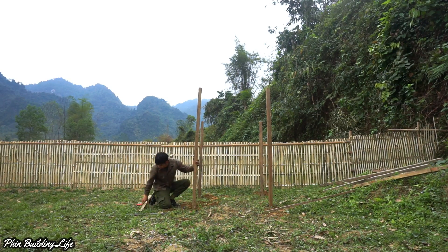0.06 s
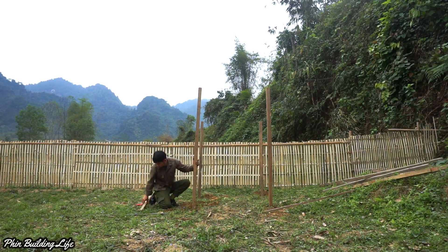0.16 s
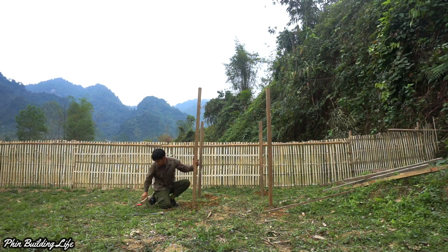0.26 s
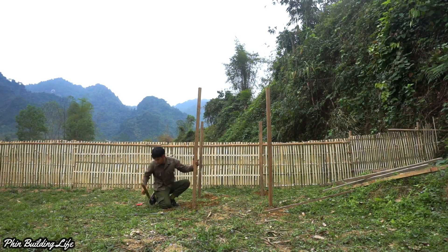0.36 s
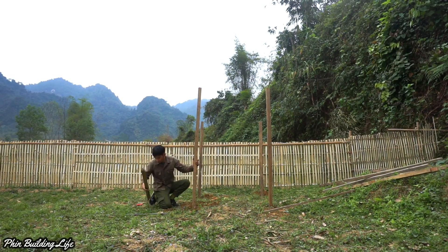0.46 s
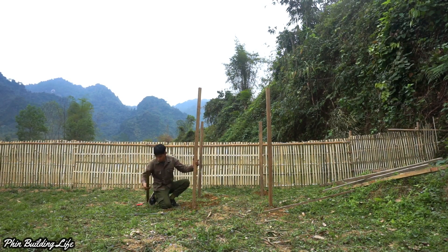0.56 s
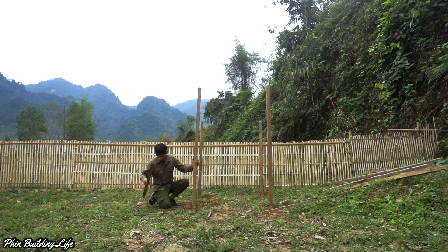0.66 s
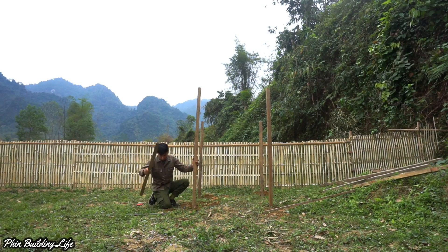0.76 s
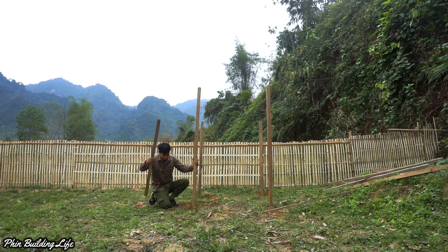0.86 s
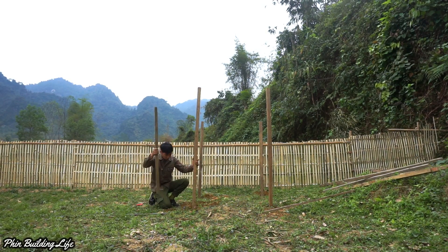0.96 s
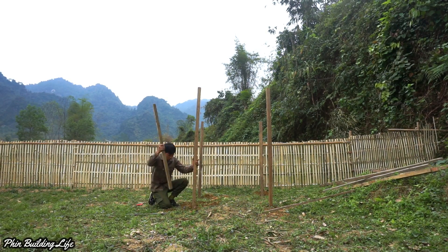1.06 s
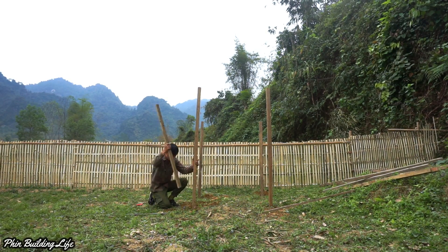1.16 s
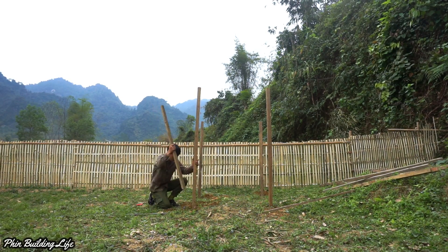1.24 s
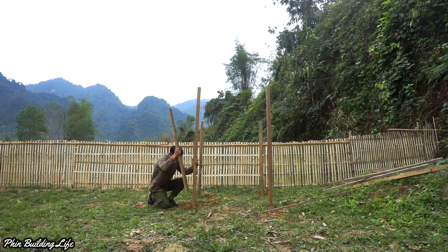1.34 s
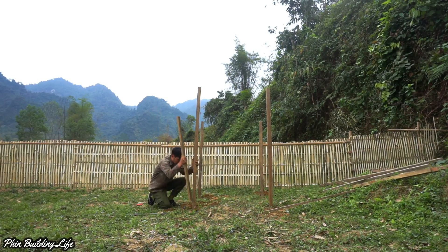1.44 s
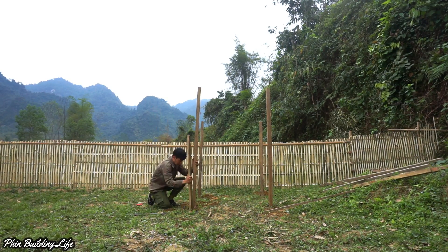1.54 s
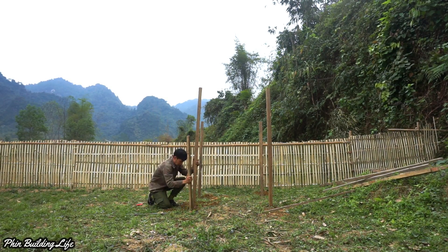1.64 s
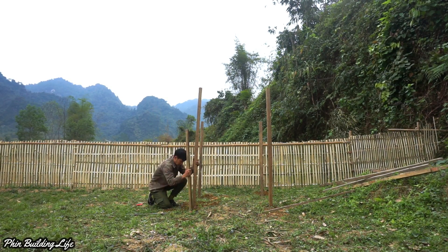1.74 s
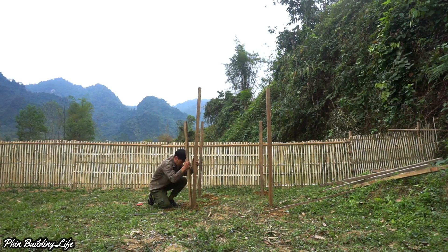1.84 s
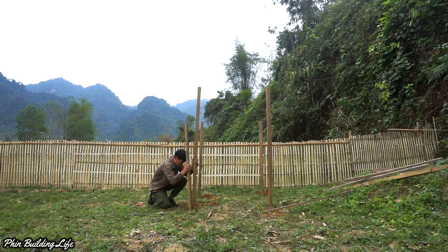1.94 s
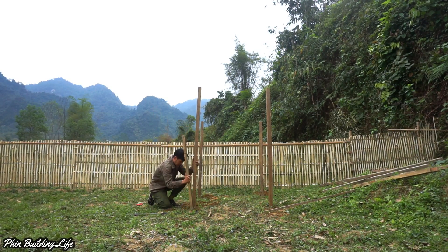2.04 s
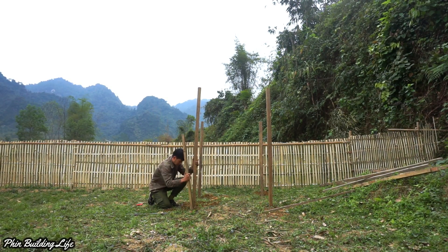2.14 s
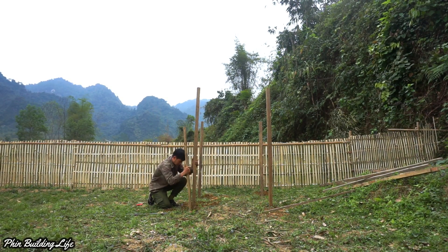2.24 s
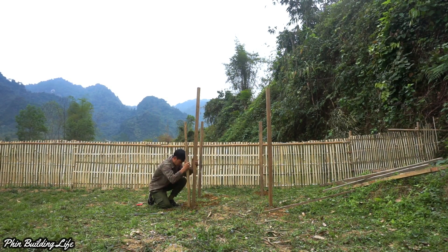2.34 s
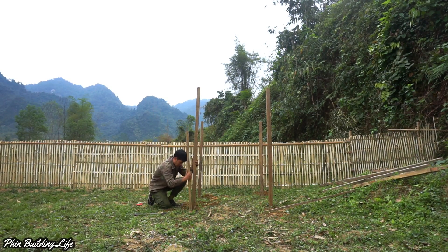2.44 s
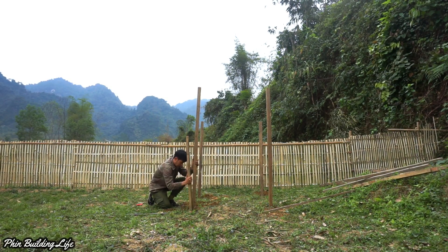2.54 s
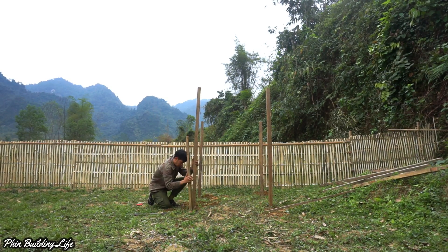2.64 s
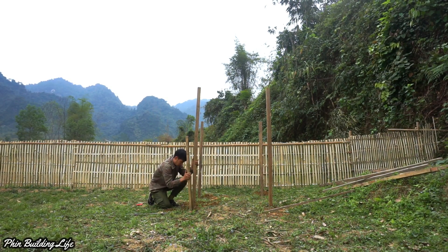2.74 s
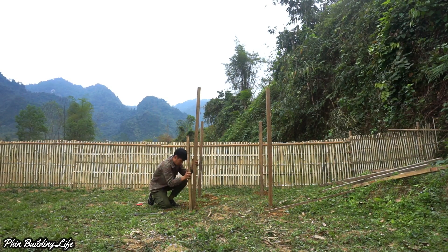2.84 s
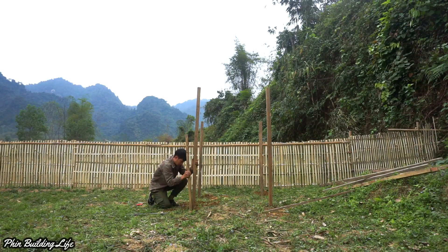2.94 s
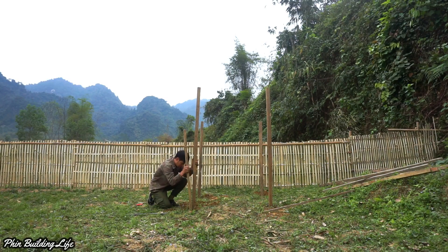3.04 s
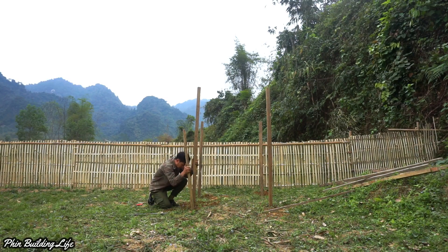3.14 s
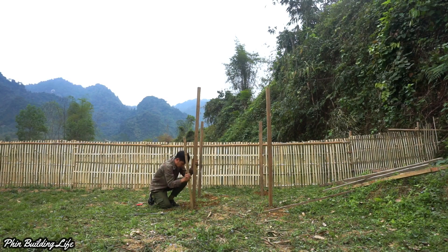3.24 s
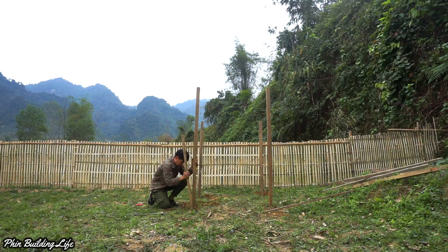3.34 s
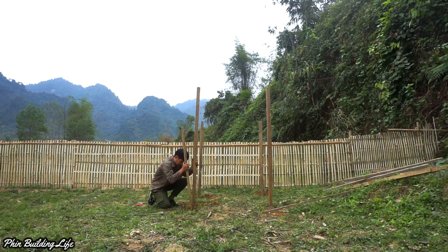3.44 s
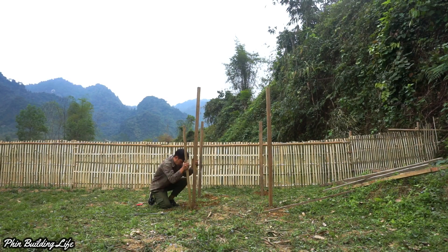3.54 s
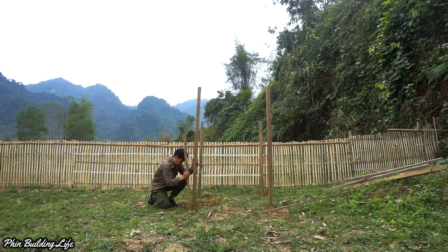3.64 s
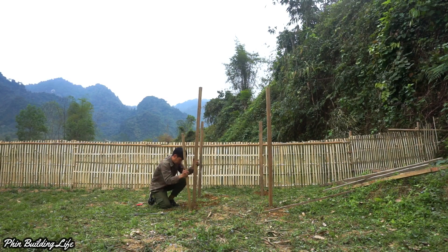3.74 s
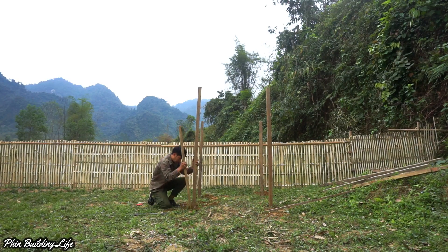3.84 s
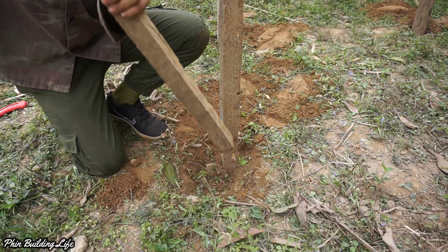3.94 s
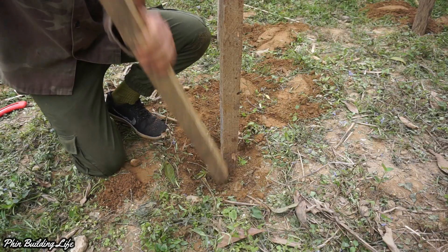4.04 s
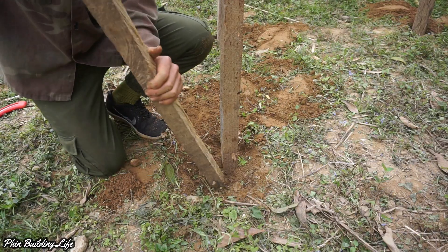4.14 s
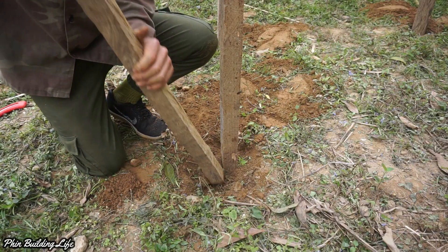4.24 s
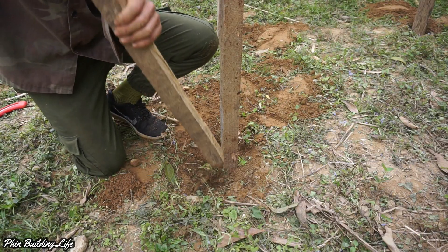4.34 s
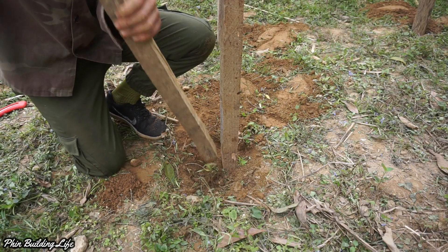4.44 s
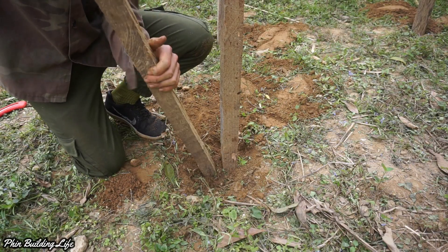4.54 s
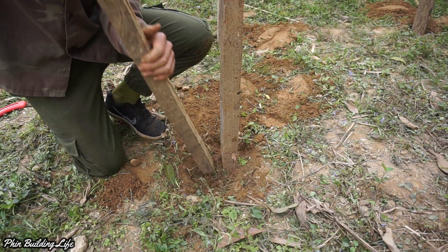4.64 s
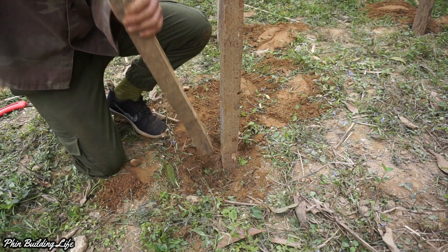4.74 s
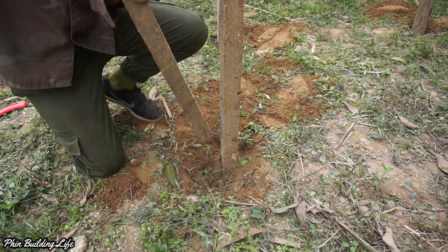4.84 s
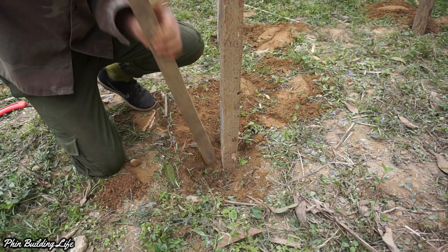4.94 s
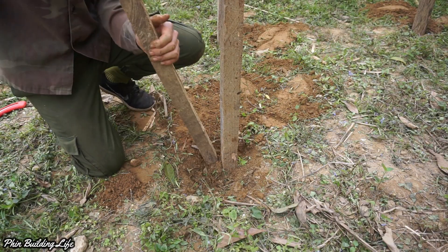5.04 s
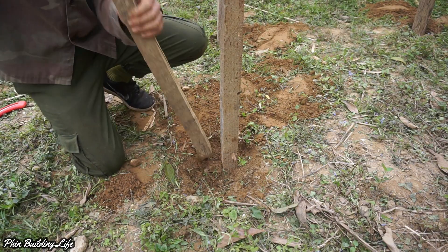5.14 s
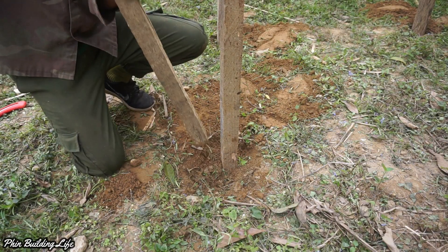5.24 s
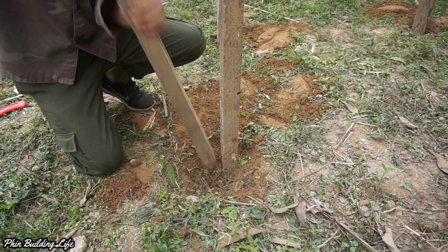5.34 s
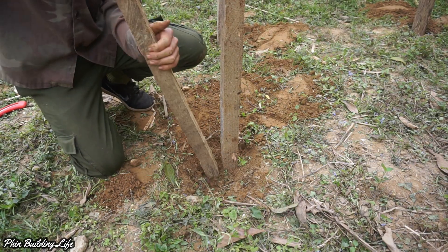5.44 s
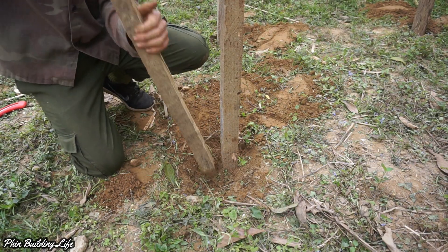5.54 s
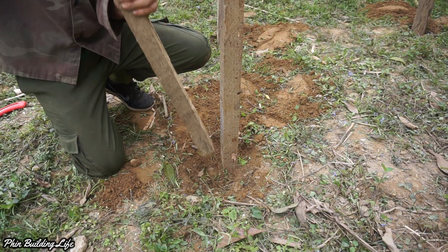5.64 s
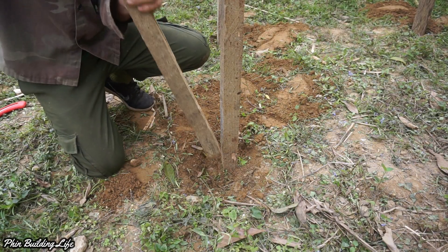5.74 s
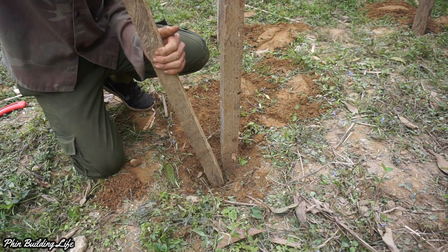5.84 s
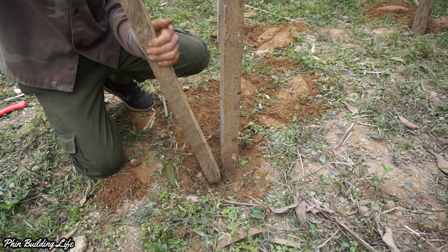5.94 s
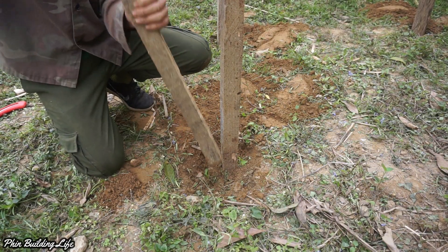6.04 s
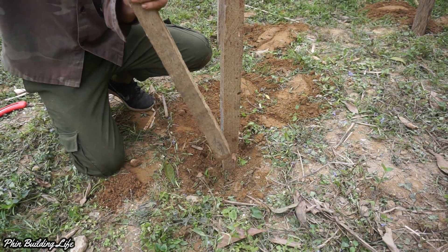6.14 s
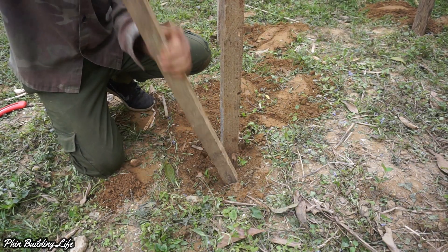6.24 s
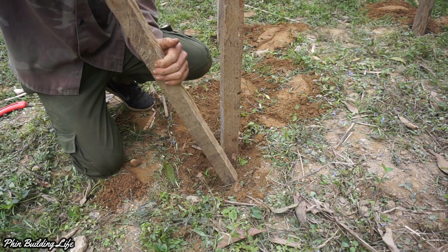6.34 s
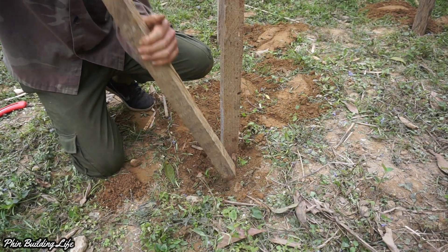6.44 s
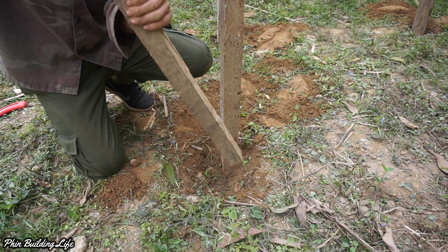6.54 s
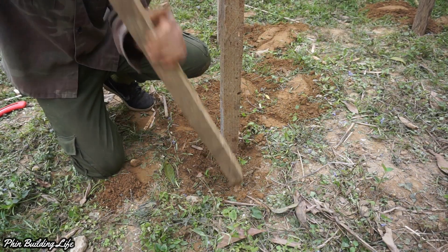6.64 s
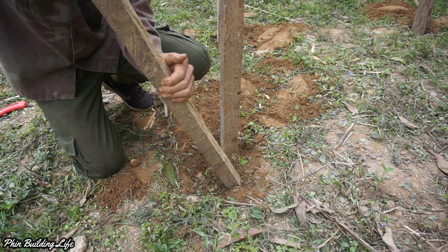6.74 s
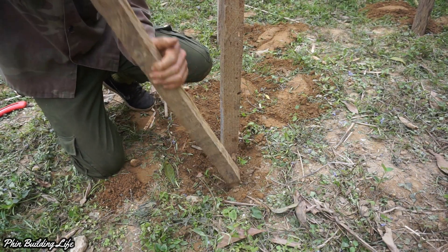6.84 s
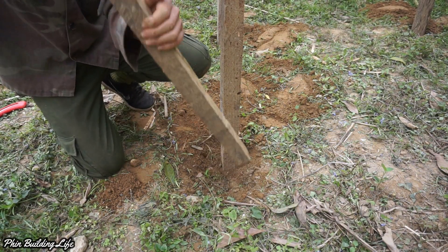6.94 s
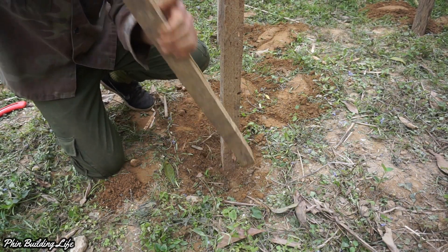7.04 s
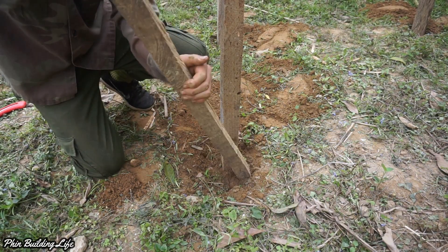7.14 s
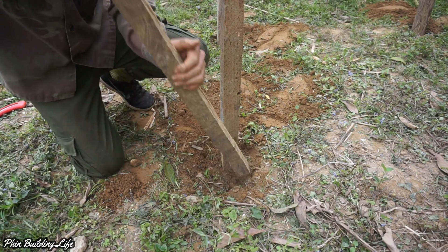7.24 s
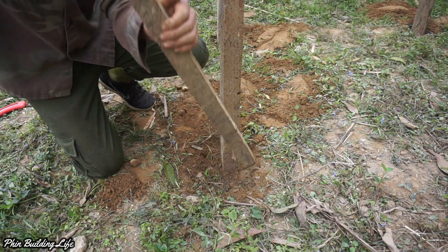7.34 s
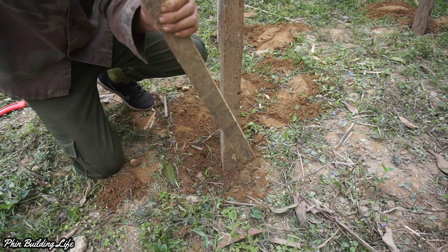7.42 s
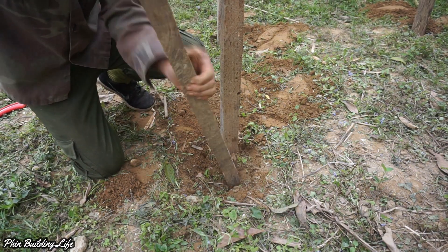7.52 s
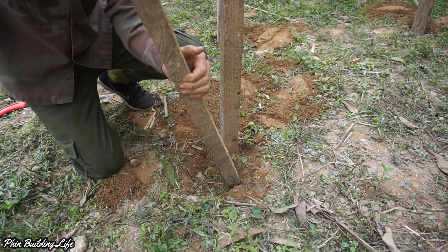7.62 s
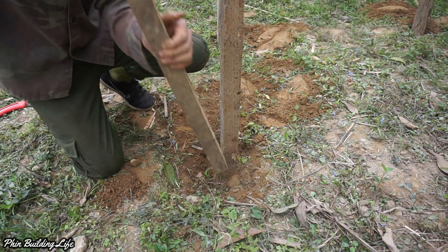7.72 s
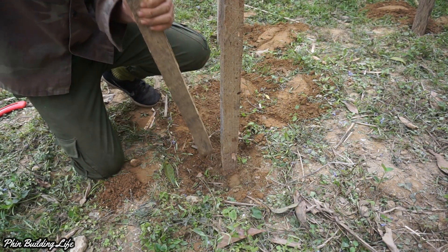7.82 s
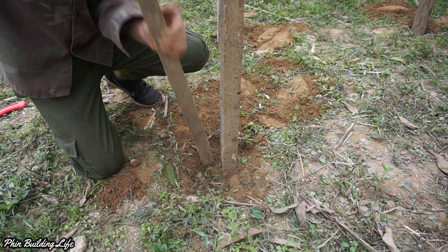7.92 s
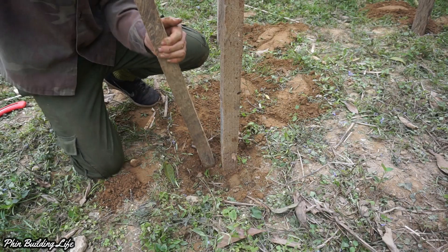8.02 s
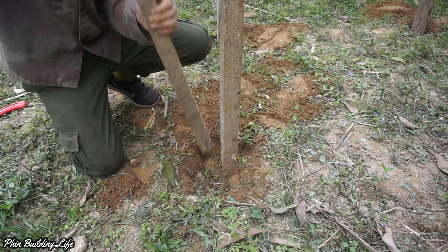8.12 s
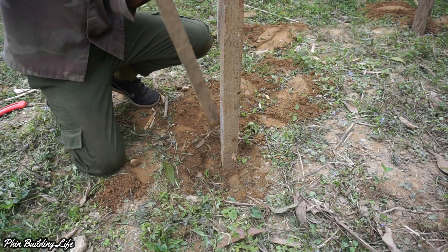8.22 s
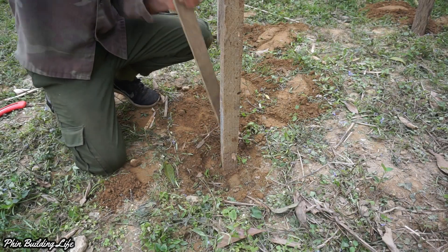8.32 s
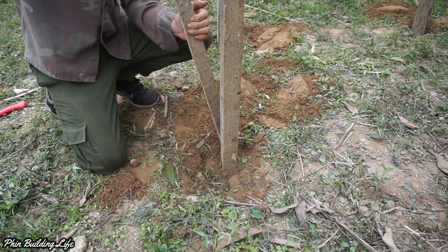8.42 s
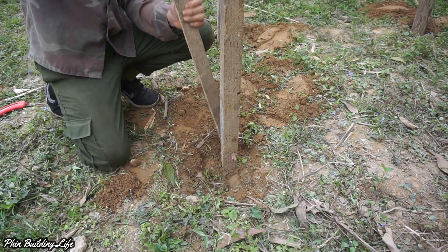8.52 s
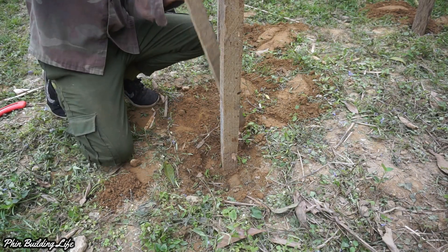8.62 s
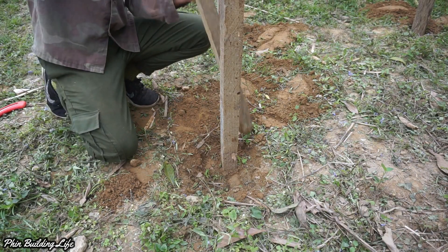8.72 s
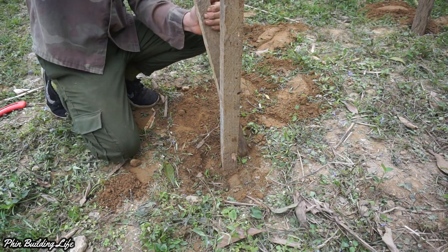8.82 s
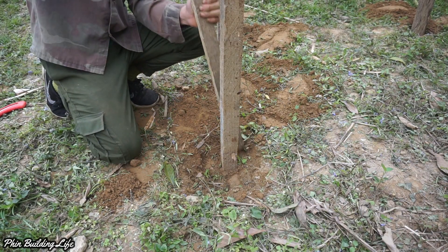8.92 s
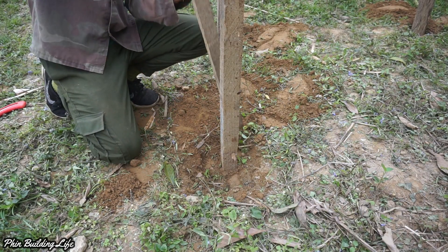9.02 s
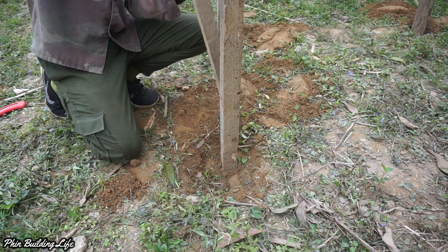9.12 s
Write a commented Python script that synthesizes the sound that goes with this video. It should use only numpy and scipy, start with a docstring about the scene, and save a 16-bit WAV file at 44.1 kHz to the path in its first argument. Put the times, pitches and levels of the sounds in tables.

```python
"""A wooden stick rams loose earth around a post in a field, first some way off, then close by.
Each stroke crunches through crumbs and thuds on packed soil; some clack against the post.
Loose soil and clothing rustle. Crickets scrape their wings in the grass, one near, many farther off.
Behind them: open air, two faint whistles and one distant knock."""
import sys
import numpy as np
from scipy import signal
from scipy.fft import rfft, irfft
from scipy.io import wavfile
from scipy.ndimage import uniform_filter1d

SR = 44100
rng = np.random.default_rng(int(sys.argv[2]) if len(sys.argv) > 2 else 0)


def wav_record(signal):
    """Record a signal, one row per channel, as 16-bit PCM in the file named by sys.argv[1]."""
    frames = np.transpose(np.atleast_2d(signal))
    bounded = np.clip(frames, -1, 1)
    # unit amplitude maps onto the largest positive 16-bit level
    quanta = np.round(bounded * 32767).astype(np.int16)
    wavfile.write(sys.argv[1], SR, quanta)


N = 404397
TIME_S, FREQ_HZ = np.arange(N) / SR, np.fft.rfftfreq(N, 1 / SR)
EVENT_S = TIME_S[:SR // 2]

# open-air spectrum: freq_hz, density_db
AIR_SPECTRUM = [(15, -19), (27, -4.5), (48, -4), (80, -4), (150, -4.5), (250, -6.5), (460, -7.5),
                (680, -7.5), (1100, -10.5), (1400, -10.5), (2900, -14.5), (4300, -13), (5000, -16.5),
                (12800, -20), (16000, -25)]
# left-right likeness of the air: freq_hz, correlation
AIR_CORRELATION = [(60, 0.99), (180, 0.33), (550, -0.52), (1650, -0.49), (4970, -0.25), (15000, 0.22)]
# phase between the microphone ports: freq_hz, left_lead_rad
PORT_LEAD = [(20, .1), (60, 0.28), (150, 0.53), (350, 1.2), (700, 1.42), (1300, 1.27), (2500, 1.38),
             (6500, 1.03), (14000, 1.26)]
# balance between the ports: freq_hz, left_minus_right_db
PORT_TILT = [(60, -0.5), (150, 0), (380, -1), (950, -2), (2380, -4.5), (5980, -1.5), (15000, -6)]
# thin whistles: start_s, length_s, pitch_hz, level_db
WHISTLE_NOTES = [(0, 1.6, 1392, -78), (2.382, 0.38, 1060, -69)]
# distant knock: freq_hz, level_db, t60_s
FAR_KNOCK_MODES = [(454, -55, 0.16), (533, -60, 0.12), (675, -57, 0.47), (976, -61, 0.33), (1394, -61, .15),
                   (1800, -59, 0.2), (2260, -60.5, 0.23)]
# blurred cricket chorus: time_s, level_db
CHORUS_LEVELS = [(0, -71), (1, -84), (2.7, -70), (3.8, -92), (4.05, -67), (4.6, -67.5), (5.4, -72),
                 (9.1, -68)]
# farther cricket: time_s, level_db
FAR_CRICKET_LEVELS = [(0, -72.5), (.9, -70), (1.4, -75.5), (2.4, -65.5), (3, -79), (3.4, -70), (3.8, -85),
                      (4.1, -70.5), (9.1, -64.5)]
# near cricket warming up: time_s, level_db, pitch_hz
CRICKET_CONTOUR = [(5.2, -67, 3860), (5.7, -60, 3860), (6, -53.5, 3940), (6.4, -52, 4030), (8, -51.5, 4067),
                   (9.1, -53, 4026)]
# its phrases, double chirps then triples: start_s, double_count, triple_count
CRICKET_PHRASES = [(5.227, 3, 0), (5.73, 2, 0), (5.945, 4, 1), (6.368, 1, 3), (6.763, 2, 2), (7.148, 9, 1),
                   (7.947, 2, 1), (8.2, 3, 2), (8.64, 7, 0)]
# soil slides or a sleeve brushes: peak_s, scuff_db, swish_db, fall_s
RUSTLES = [(.53, -66, -64, .1), (1.77, -66, -61, .03), (4.26, -71, -66, 0.25), (4.85, -54.5, -48, 0.057),
           (4.946, -65, -39, 0.029), (5.02, -47, -50, 0.035), (5.13, -66, -60, .05),
           (5.57, -76, -61, 0.034), (7.87, -59.5, -56.5, 0.052), (8.155, -54, -54, 0.049),
           (8.52, -73, -62.5, 0.086)]
# swish spectrum: freq_hz, density_db
SWISH_SPECTRUM = [(1500, -15), (3000, -3.5), (5000, -6.5), (8000, -0.5), (12500, 1), (16000, -4)]
# stick hits post: start_s, level_db, pitch_ratio, edge_hz
POST_HITS = [(2.0455, -28, 1.3, 2600), (2.05, -32.5, 0.83, 3000), (2.539, -40.5, 0.55, 3500),
             (4.137, -33, .69, 1800), (4.1608, -27.5, 1.14, 2500), (4.195, -31, 1.07, 3000),
             (4.567, -29, 1.2, 2200), (4.597, -40, 0.96, 2500), (5.023, -11, .962, 4200),
             (5.446, -20, 0.96, 1800), (5.8474, -29, .8, 3000), (5.8742, -12.5, 1.194, 3350),
             (6.3152, -23.5, 0.87, 1800), (6.321, -13.5, 0.567, 1300), (6.729, -28, 0.82, 2500),
             (6.739, -24, 0.92, 2000), (7.1531, -13, .966, 3430), (7.596, -26, 1.3, 2500),
             (7.619, -26.5, 1.01, 3000), (8.002, -31, 1.02, 2200)]
# gripped stick against the post: freq_hz, level_db, t60_s
WOOD_MODES = [(1066, -17, 0.032), (1435, -17, 0.033), (1765, -3, 0.026), (1880, -2.5, 0.013),
              (2150, -3.5, 0.015), (2470, -2, 0.0099), (3170, -6, 0.019), (3475, -6.5, 0.014),
              (3900, 1, 0.0068)]
# stick grazes the rim of the hole: peak_s, body_db, grit_db
RIM_GRAZES = [(1.585, -50, -43.5), (1.602, -52.5, -43), (3.244, -64, -53), (4.263, -48, -51),
              (4.669, -50.5, -48.5), (6.731, -41, -54), (7.619, -46, -42), (7.654, -46.5, -50),
              (8.044, -49.5, -48)]
# crunch body and scuff spectrum: freq_hz, density_db
BODY_SPECTRUM = [(200, -17), (400, 0.5), (750, -12.5), (1050, -1), (1220, -7.5), (1450, 1), (1900, -1),
                 (2700, -1.5), (3100, -4.5), (4200, -3), (5500, -21.5), (9000, -40)]
# grit spectrum: freq_hz, density_db
GRIT_SPECTRUM = [(1500, -25), (3500, -4.5), (5500, -1), (8000, -0.5), (12500, 0), (16000, -5)]
# ground rumble spectrum: freq_hz, density_db
RUMBLE_SPECTRUM = [(20, -21), (45, -6), (70, -3.5), (120, 0.5), (200, 2.5), (320, -7), (480, -15.5),
                   (800, -15), (1500, -29.5)]
# packed ground: freq_hz, level_db, t60_s
GROUND_MODES = [(46, -9.5, 0.45), (99, -9, 0.12), (155, -20, 0.14), (290, -18, 0.1)]
# stick end seated on hard earth: freq_hz, level_db, t60_s
SEAT_MODES = [(250, -11, 0.062), (337, -9.5, 0.066), (467, -6, 0.035), (613, -1.5, 0.022),
              (860, -15, 0.0095), (930, -30, .018)]
# post humming in its hole: freq_hz, level_db, t60_s
POST_MODES = [(140.3, -4.5, 0.5), (185, -6, 0.25), (233.4, -11.5, 0.26), (278.5, -11, 0.28)]
# ramming: time_s, thud_db, push_db, knock_db, hum_db, body_db, grit_db, crunch_rise_s, crunch_fall_s
RAM_STROKES = [(1.628, -60.5, -60, -52, -71, -53.5, -50, 0.022, 0.023),
               (2.057, -62, -58, -42.5, -60, -46, -60, 0.005, 0.005),
               (2.096, -62, -60, -48, -57, -47, -48.5, .027, 0.02),
               (2.547, -54, -70, -41.5, -67, -54.5, -53, 0.0058, 0.028),
               (3.276, -62, -68, -43.5, -68, -50.5, -52, 0.015, 0.03),
               (3.690, -64, -63, -50.5, -68, -54.5, -50.5, 0.019, .016),
               (4.139, -35, -34, -29, -48, -33.5, -35.5, 0.0097, 0.01),
               (4.567, -40, -38, -39, -57, -35, -34.5, 0.01, 0.011),
               (5.024, -54, -42, -42, -58, -41, -28.5, 0.0074, 0.0045),
               (5.444, -32, -24.5, -36, -59, -35, -31.5, 0.0063, 0.0094),
               (5.850, -48, -67, -33.5, -67, -35, -39.5, 0.0024, 0.0072),
               (5.882, -36, -39, -32.5, -46, -34, -36.5, 0.0033, 0.012),
               (6.324, -33, -27.5, -30, -36.5, -38.5, -39.5, 0.0077, 0.0097),
               (6.748, -43.5, -46, -51, -64, -40, -42, 0.012, 0.017),
               (7.160, -44.5, -50, -41, -62, -37.5, -43, 0.0065, 0.015),
               (7.595, -34.5, -34, -31.5, -37.5, -33, -35.5, 0.0062, .0055),
               (8.014, -54, -41.5, -49, -45.5, -41, -41.5, 0.017, 0.0078),
               (8.435, -33.5, -26.5, -28, -43, -38, -38.5, 0.015, 0.0071),
               (8.843, -35.5, -36, -32, -49, -39, -39.5, .014, 0.015)]


def amp(db):
    """Decibels to gain."""
    return 10 ** (np.asarray(db) / 20)


def unit_rms(x):
    """Scale to rms 1."""
    return x / np.sqrt(np.mean(x ** 2) + 1e-20)


def per_bin(points):
    """Table interpolated over log frequency."""
    hz, value = np.transpose(points)
    return np.interp(np.log(FREQ_HZ + 1), np.log(hz + 1), value)


def colour(x, spectrum):
    """Filter by a spectrum; rms 1."""
    return unit_rms(irfft(rfft(x) * amp(per_bin(spectrum)), N))


def wander(period_s):
    """Random drift, mostly slower than period_s; rms 1."""
    return unit_rms(irfft(rfft(rng.standard_normal(N)) / (1 + (FREQ_HZ * period_s) ** 4), N))


def add(mix, start_s, sound):
    """Mix a sound in at start_s."""
    part = mix[max(round(start_s * SR), 0):][:len(sound)]
    part += sound[:len(part)]


def ring(modes, pitch_ratio=1, edge_hz=np.inf):
    """Decaying modes; soft contact weakens those above edge_hz."""
    return sum(amp(db - 60 * EVENT_S / t60_s) * np.sin(2 * np.pi * hz * pitch_ratio * EVENT_S)
               / np.hypot(1, (hz / edge_hz) ** 2) for hz, db, t60_s in modes)


def burst(peak_s, level_db, rise_s, fall_s, lead_s=0.1):
    """Pressure builds to peak_s, then relaxes. Returns start_s, envelope."""
    t = EVENT_S - lead_s
    envelope = np.exp(-(np.minimum(t, 0) / rise_s) ** 2 - np.maximum(t, 0) / fall_s)
    return peak_s - lead_s, amp(level_db) * envelope


def grains(spectrum, per_s, spread_db):
    """Tiny fractures of uneven size, filtered; rms 1."""
    size = amp(spread_db * np.minimum(rng.exponential(1, N), 2))
    clicks = size * rng.choice([-1, 1], N) * (rng.random(N) < per_s / SR)
    return colour(clicks, spectrum)


def air(level_db=-58.5, breeze_hz=300, hiss_hz=6000, close_s=3.95):
    """Open air: the low end stirs with the breeze; the hiss is softer before close_s."""
    left, other = (colour(rng.standard_normal(N), AIR_SPECTRUM) for _ in range(2))
    correlation = np.clip(per_bin(AIR_CORRELATION), -1, 1)
    right = irfft(correlation * rfft(left) + np.sqrt(1 - correlation ** 2) * rfft(other), N)
    pair = np.array([left, right])
    low = signal.sosfiltfilt(signal.butter(2, breeze_hz, fs=SR, output="sos"), pair)
    hiss = signal.sosfiltfilt(signal.butter(2, hiss_hz, "highpass", fs=SR, output="sos"), pair)
    middle = pair - low - hiss
    breeze_db = -0.5 * wander(period_s=0.36)
    hiss_db = -1.5 * (TIME_S < close_s)
    return amp(level_db) * (low * amp(breeze_db) + middle + hiss * amp(hiss_db))


def whistles(waver_hz=25):
    """Thin wavering tones that swell and fade."""
    out = np.zeros(N)
    for start_s, length_s, pitch_hz, level_db in WHISTLE_NOTES:
        waver = unit_rms(uniform_filter1d(rng.standard_normal(N), 300))[:int(length_s * SR)]
        tone = np.sin(2 * np.pi * np.cumsum(pitch_hz + waver_hz * waver) / SR)
        add(out, start_s, amp(level_db) * signal.windows.tukey(len(tone), 0.5) * tone)
    return out


def far_knock(start_s=0.511, echo_fall_s=0.036):
    """One knock; distance trails it with a cluster of echoes."""
    out, t = np.zeros(N), TIME_S[:SR // 8]
    echoes = rng.standard_normal(len(t)) * np.exp(-t / echo_fall_s)
    echoes *= 0.4 / np.linalg.norm(echoes)
    echoes[0] += 1  # direct path
    add(out, start_s, signal.fftconvolve(ring(FAR_KNOCK_MODES), echoes))
    return out


def wing_stroke(pitch_hz, length_s=0.016, sag=0.055):
    """One wing scrape: a pure note that sags as the wings slow."""
    t = np.arange(0, length_s, 1 / SR)
    glide_hz = pitch_hz * (1 - sag * (t / length_s - 0.5))
    return signal.windows.tukey(len(t), 0.8) * np.sin(2 * np.pi * np.cumsum(glide_hz) / SR)


def far_crickets(pitch_hz=4020, chorus_hz=4350, spread_hz=20, chirp_gap_s=0.077, wing_gap_s=0.0225):
    """One cricket chirps in pairs; many others blur into a thin high tone."""
    pairs = np.zeros(N)
    for beat_s in np.arange(0, N / SR, chirp_gap_s):
        start_s = beat_s + rng.uniform(0, 0.012)
        for delay_s in (0, wing_gap_s):
            gain = amp(rng.normal(0, 1))
            add(pairs, start_s + delay_s, gain * wing_stroke(rng.normal(pitch_hz, spread_hz), sag=0.042))
    chorus = irfft(rfft(rng.standard_normal(N)) / (1 + ((FREQ_HZ - chorus_hz) / 120) ** 2), N)
    pairs_db = np.interp(TIME_S, *np.transpose(FAR_CRICKET_LEVELS))
    chorus_db = np.interp(TIME_S, *np.transpose(CHORUS_LEVELS))
    return unit_rms(pairs) * amp(pairs_db) + unit_rms(chorus) * amp(chorus_db)


def near_cricket(spread_hz=15, spread_db=2.2, wing_gap_s=0.0225, rest_s=0.0335):
    """Chirps of two or three wing strokes, each chirp followed by a short rest."""
    out = np.zeros(N)
    times_s, levels_db, pitches_hz = np.transpose(CRICKET_CONTOUR)
    for time_s, doubles, triples in CRICKET_PHRASES:
        for stroke_count in [2] * doubles + [3] * triples:
            for _ in range(stroke_count):
                note = wing_stroke(np.interp(time_s, times_s, pitches_hz) + rng.normal(0, spread_hz))
                level_db = np.interp(time_s, times_s, levels_db) + rng.normal(0, spread_db)
                add(out, time_s - len(note) / SR / 2, amp(level_db) * note)
                time_s += wing_gap_s
            time_s += rest_s
    return out


def rustle(rise_s=0.03):
    """Sliding soil or a brushing sleeve: soft scuff, fine grainy swish."""
    scuff, swish = np.zeros((2, N))
    for peak_s, scuff_db, swish_db, fall_s in RUSTLES:
        add(scuff, *burst(peak_s, scuff_db, rise_s, fall_s))
        add(swish, *burst(peak_s, swish_db, rise_s, fall_s))
    scuff *= grains(BODY_SPECTRUM, per_s=12000, spread_db=3.5)
    swish *= grains(SWISH_SPECTRUM, per_s=18000, spread_db=11)
    return scuff + swish


def clacks(tick_db=-11, tick_fall_s=0.0041, contact_s=0.00053):
    """Stick glances off the post: a tick and a short wooden ring, both duller on soft contact."""
    out = np.zeros(N)
    attack = 1 - np.exp(-EVENT_S / contact_s)
    for start_s, level_db, pitch_ratio, edge_hz in POST_HITS:
        lowpass = signal.butter(2, 0.97 * edge_hz, fs=SR)
        noise = np.exp(-EVENT_S / tick_fall_s) * rng.standard_normal(len(EVENT_S))
        tick = amp(tick_db) * signal.lfilter(*lowpass, noise)
        add(out, start_s, amp(level_db) * attack * (ring(WOOD_MODES, pitch_ratio, edge_hz) + tick))
    return out


def crunches(graze_rise_s=0.0041, graze_fall_s=0.003, clod_s=0.0058, clod_db=3):
    """Breaking crumbs sound through the stick (body) and straight into the air (grit)."""
    body, grit = np.zeros((2, N))
    grazes = [(*row, graze_rise_s, graze_fall_s) for row in RIM_GRAZES]
    for peak_s, *_, body_db, grit_db, rise_s, fall_s in list(RAM_STROKES) + grazes:
        add(body, *burst(peak_s, body_db, rise_s, fall_s))
        add(grit, *burst(peak_s, grit_db, rise_s, fall_s))
    body *= grains(BODY_SPECTRUM, per_s=12000, spread_db=2)
    grit *= grains(GRIT_SPECTRUM, per_s=18000, spread_db=5.5)
    return (body + grit) * amp(clod_db * wander(clod_s))  # clods give way one by one


def thuds(sharp_push_s=0.001, soft_push_s=0.00216, ring_lead_s=0.0021, seat_lead_s=0.00076,
          rumble_lag_s=0.0043, shake_lag_s=0.019):
    """Soil gives under each blow: a push of air, hollow knock, ring of ground and post, dull rumble."""
    out, rumble = np.zeros((2, N))
    ground, seat, post = ring(GROUND_MODES), ring(SEAT_MODES), ring(POST_MODES)
    centre_s = EVENT_S.mean()
    for time_s, thud_db, push_db, knock_db, hum_db, *_ in RAM_STROKES:
        width_s = min(sharp_push_s * amp(0.6 * (-26 - push_db)), soft_push_s)  # harder is shorter
        u = (EVENT_S - centre_s) / width_s
        add(out, time_s - centre_s, amp(push_db) * (1 - u ** 2) * np.exp(-u ** 2 / 2))
        add(out, time_s - ring_lead_s, amp(thud_db) * ground + amp(hum_db) * post)
        add(out, time_s - seat_lead_s, amp(knock_db) * seat)
        rumble_db = -17 + 0.54 * thud_db  # grows more slowly than the thud
        add(rumble, *burst(time_s + rumble_lag_s, rumble_db, rise_s=0.0073, fall_s=0.015))
        add(rumble, *burst(time_s + shake_lag_s, rumble_db - 18, rise_s=0.0073, fall_s=0.086))
    return out + rumble * colour(rng.standard_normal(N), RUMBLE_SPECTRUM)


def scatter(x, level_db, fall_s):
    """Grass, fence and hillside return a decaying tail, different in each channel."""
    taps = rng.standard_normal((2, len(EVENT_S))) * np.exp(-EVENT_S / fall_s) * (EVENT_S > 0.002)
    return amp(level_db) * signal.oaconvolve(x[None], taps / np.linalg.norm(taps[0]), axes=1)[:, :N]


def ports(x):
    """Mono to stereo: two microphone ports, offset in phase and level."""
    half = np.exp(1j * per_bin(PORT_LEAD) / 2) * amp(per_bin(PORT_TILT) / 2)
    return irfft(rfft(x) * np.array([half, 1 / half]), N)


def scene():
    """Ramming and its echoes over a far knock, crickets, whistles and open air."""
    earth, wood = crunches() + rustle(), clacks()
    direct = amp(-1.5) * (thuds() + earth + wood) + far_knock()
    near_echo = scatter(earth, level_db=-13.5, fall_s=0.017) + scatter(wood, level_db=-18, fall_s=0.014)
    far_echo = scatter(earth + amp(-13.5) * wood, level_db=-16, fall_s=0.13)
    chorus = far_crickets()
    chorus_echo = scatter(chorus, level_db=-6, fall_s=0.02)
    insects = (near_cricket() + amp(-3.5) * chorus) * amp([[-1], [0]])  # slightly right
    return ports(direct) + near_echo + far_echo + insects + chorus_echo + whistles() + air()


def record(dry, low_cut_hz=36, high_cut_hz=16000):
    """Low cut and band limit."""
    cut = signal.sosfilt(signal.butter(2, low_cut_hz, "highpass", fs=SR, output="sos"), dry)
    lowpass = signal.firwin(511, high_cut_hz, window=("kaiser", 9), fs=SR)
    return signal.oaconvolve(cut, lowpass[None], "same", axes=1)


dry = scene()
out = record(dry)
wav_record(out)
```